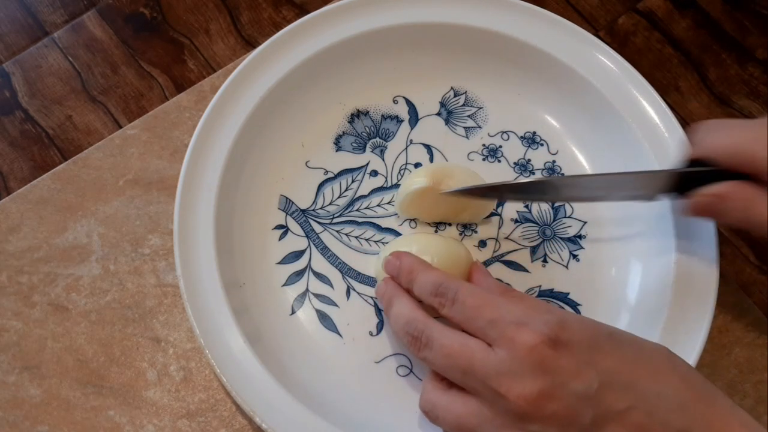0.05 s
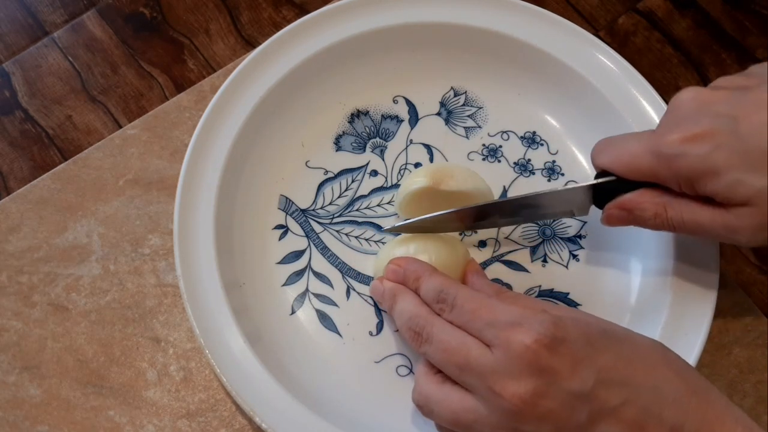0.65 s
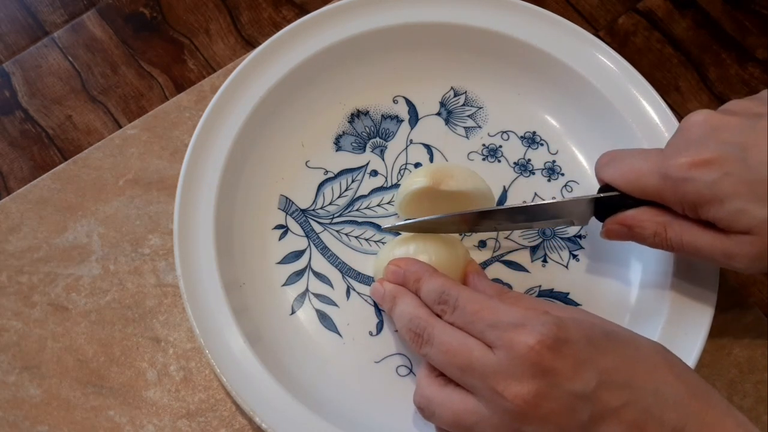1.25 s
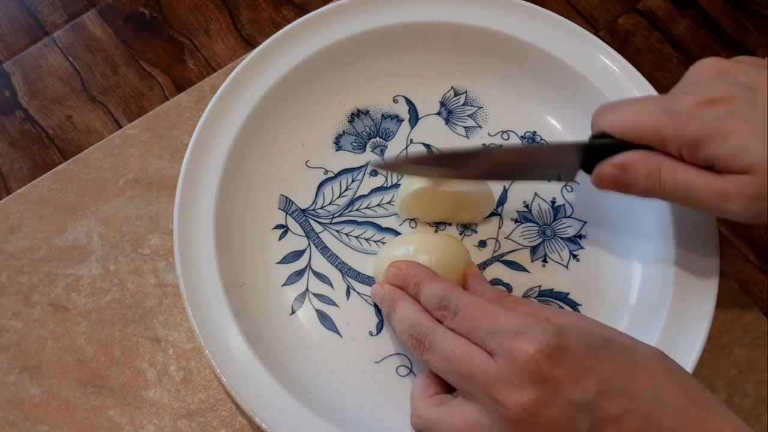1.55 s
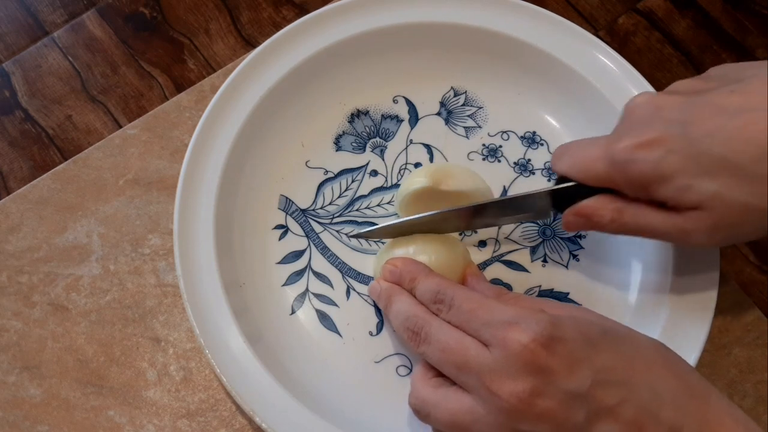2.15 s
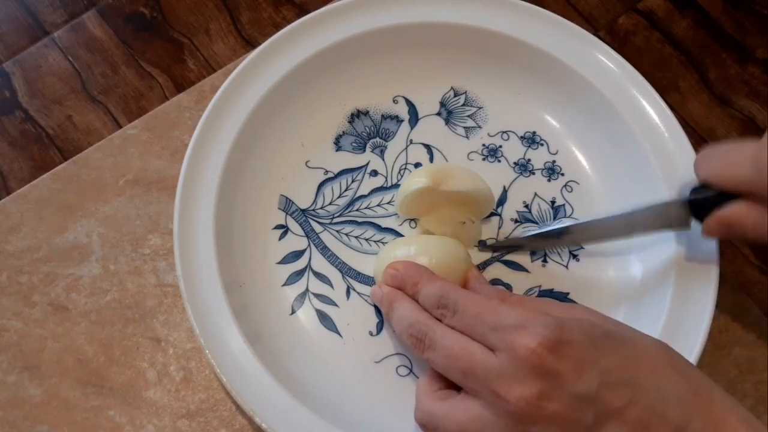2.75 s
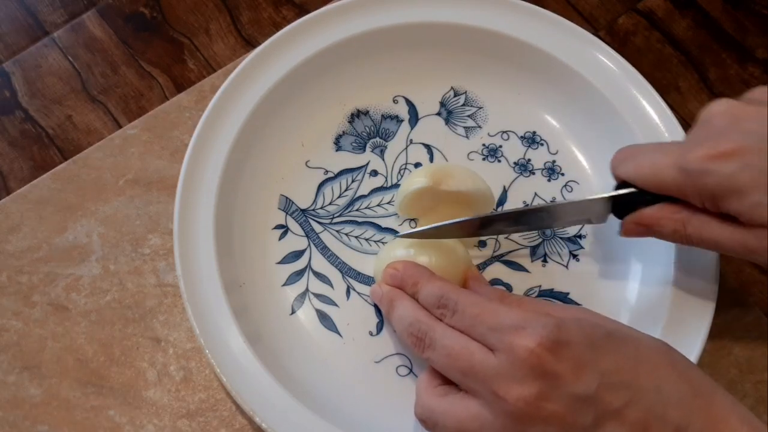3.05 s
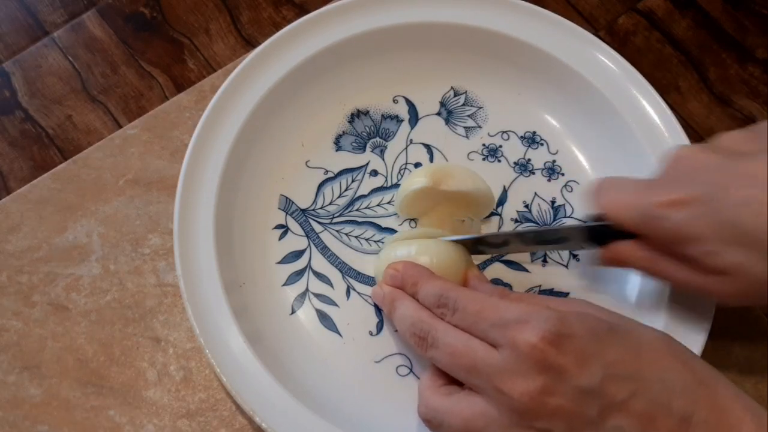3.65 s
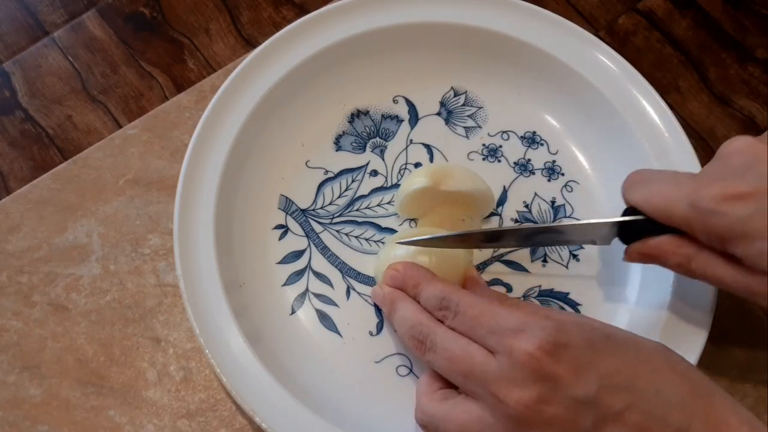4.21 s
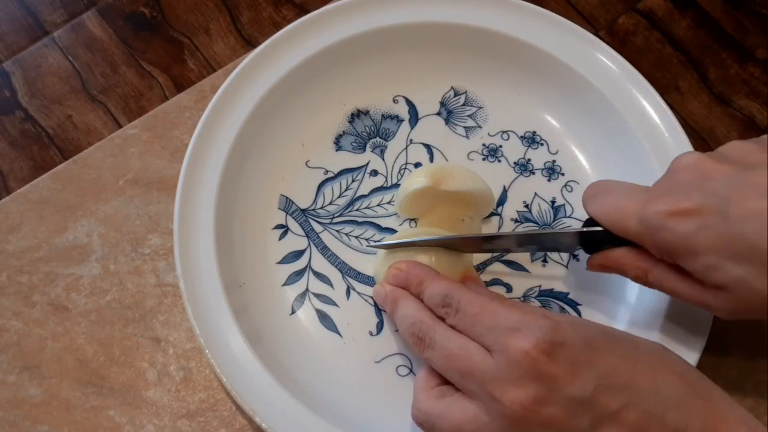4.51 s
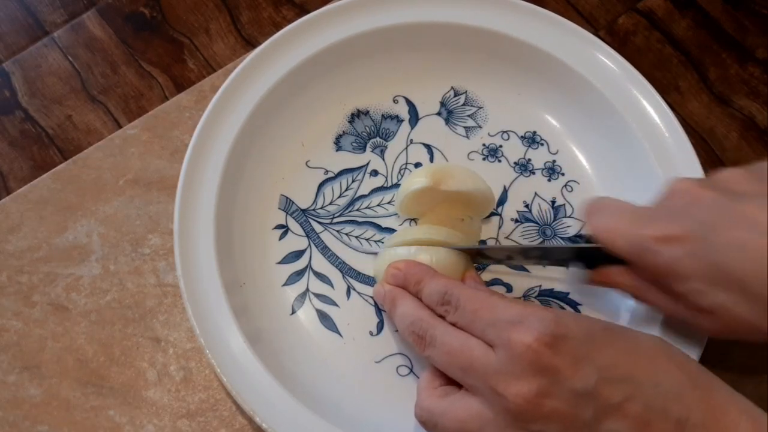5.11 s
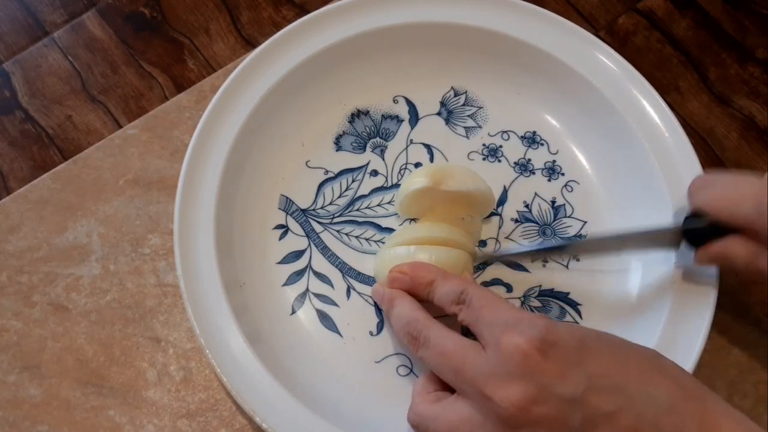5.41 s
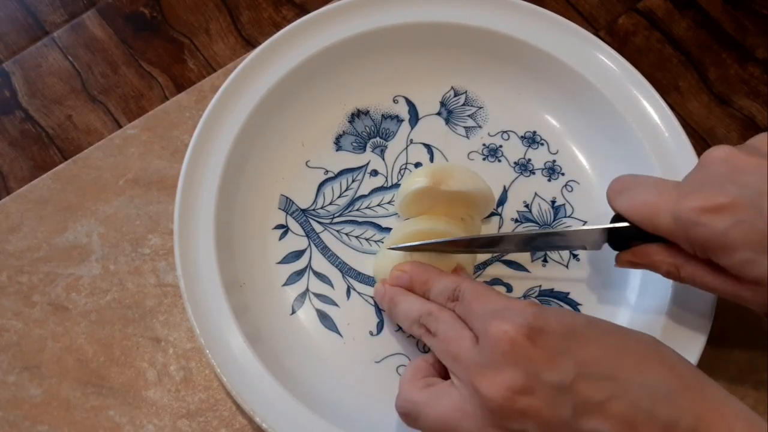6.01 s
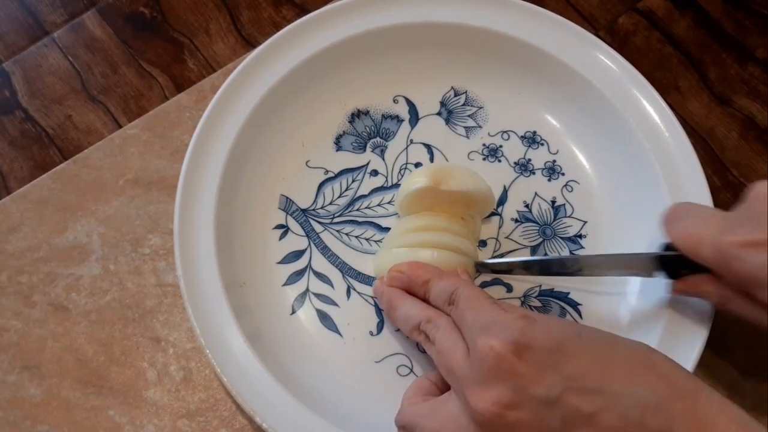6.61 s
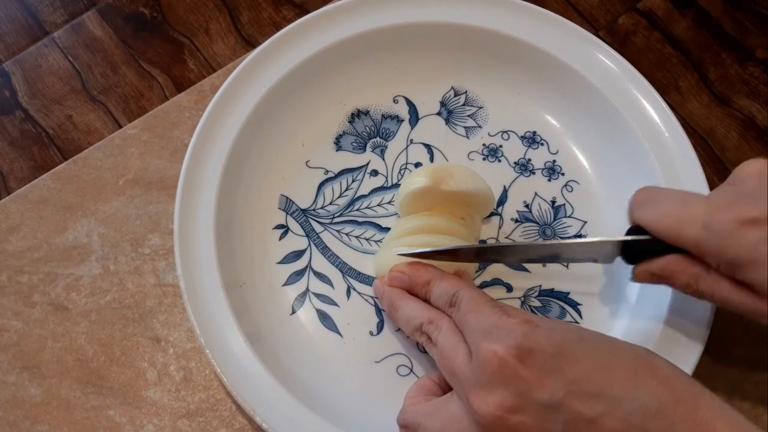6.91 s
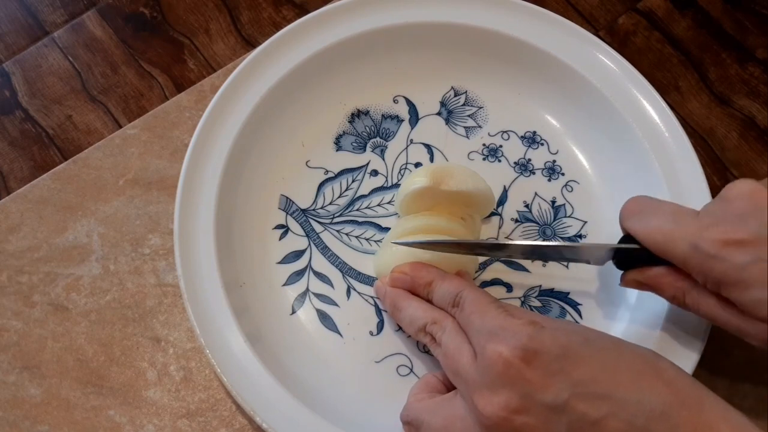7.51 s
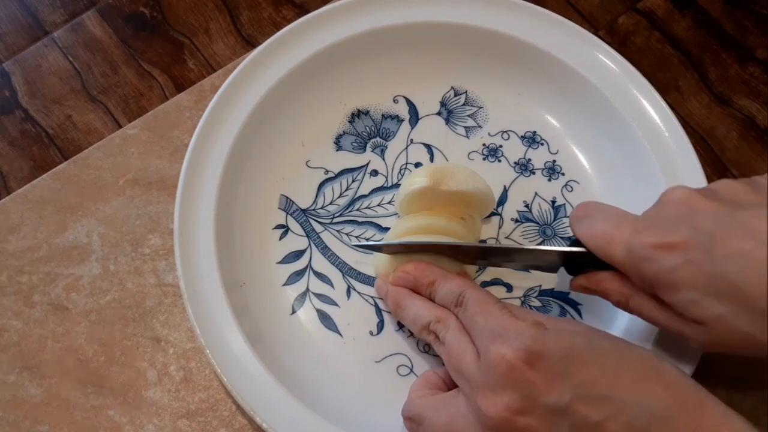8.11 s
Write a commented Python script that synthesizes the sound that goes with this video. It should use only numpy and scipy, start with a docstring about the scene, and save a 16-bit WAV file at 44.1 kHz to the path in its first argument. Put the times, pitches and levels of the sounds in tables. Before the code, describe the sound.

Motors hum with a slight throb over a soft rush of air in a kitchen. Very near the microphone, a knife pushes through an onion five times, crunching juicily and knocking against a ceramic plate and the wooden board under it. Early on, the edge rasps once across the plate as the table thumps. Between the later cuts the blade draws back with a moist crackle.

```python
"""Two motors hum and beat over a soft rush of air in a kitchen. Close to a pair of microphones, a knife
slices an onion on a ceramic plate that stands on a wooden board. In each of five cuts the blade breaks
through layer after layer, with knocks that sound the plate and board; wet cells crackle as it pushes
down and draws back. Once the edge drags on the glaze and the table thumps under the hand."""
import sys
import numpy as np
from scipy import signal
from scipy.fft import rfft, irfft, next_fast_len
from scipy.io import wavfile
from scipy.ndimage import uniform_filter1d

SR = 44100
rng = np.random.default_rng(int(sys.argv[2]) if len(sys.argv) > 2 else 0)


def int16_out(signal):
    """Quantize to a 16-bit WAV file."""
    q = np.round(np.clip(np.atleast_2d(signal).T, -1, 1) * 32767)
    wavfile.write(sys.argv[1], SR, q.astype(np.int16))


N = 364266

# colour of the air in the room: f/Hz, relative level/dB
AIR_COLOUR = [(12, -63), (20, -30), (49, -23), (134, -11), (168, -10), (193, -9), (216, -11), (248, -11.5),
              (367, -21), (558, -23), (802, -20.5), (2530, -50), (8410, -62.5), (13500, -56.5),
              (16000, -73.5)]
# how alike the room sounds at the two microphones: f/Hz, likeness/0-1
ROOM_LIKENESS = [(60, 1), (290, 0.73), (640, .42), (1400, 0), (15000, 0)]
# motors behind the scene: f/Hz, level/dB
MOTOR_HUMS = [(191.5, -44), (206, -50)]
# the background dips briefly after the thump: t/s, gain/dB
BACKGROUND_DIP = [(2.36, 1.5), (2.42, -5.5), (3.05, -6.5), (3.2, 0), (3.45, 1.5)]
# decay of the kitchen: f/Hz, t60/s
ROOM_DECAY = [(200, 0.43), (800, 0.3), (2500, 0.35), (7000, 0.33), (15000, 0.35)]
# balance of the microphones: f/Hz, left minus right/dB
MIC_BALANCE = [(30, 0.5), (190, 3.5), (300, 2), (500, 0.5), (750, 4.5), (1200, 1), (2300, 2), (5000, 2),
               (8000, 3), (14000, -1.5)]
# modes of plate and board, damped by onion and hand: f/Hz, relative level/dB, t60/s
PLATE_BOARD_MODES = [(201.8, -12, 0.12), (264.8, -2.5, 0.16), (439, -5, 0.047), (506, 1, 0.035),
                     (721, 5, 0.024), (795.7, 9, 0.027), (940, -2.5, .03), (1082, -7, 0.034),
                     (1550, 2, 0.01), (1795, 8, 0.035), (2343, 5.5, 0.066), (2530, -12.5, 0.0072),
                     (3450, -6.5, 0.013)]
# modes of the plate's free rim: f/Hz, relative level/dB, t60/s
RIM_MODES = [(1415, -9, .2), (2430, -8, .2), (2739, -7, .22), (3085, -9, .25), (3351, -9, .22),
             (3390, -7, .22), (3870, -2, .16), (4059, -5, .24), (4361, -12, .22), (4542, -12, .22),
             (4859, -10, .22)]
# modes of the gripped blade: f/Hz, relative level/dB, t60/s
BLADE_MODES = [(1038, -0.5, .04), (1331, -6, .04), (2465, -0.5, .06), (3160, -6.5, 0.04),
               (4430, -5.5, 0.06), (7240, -8.5, 0.039)]
# colour of bursting cells: f/Hz, relative level/dB
CELL_COLOUR = [(250, -5.5), (400, -12.5), (590, -13.5), (730, -0.5), (850, 1), (1270, -8.5), (1600, -5),
               (2050, -12.5), (2450, -6.5), (3500, -16), (7000, -19.5), (8800, -26), (11500, -23.5),
               (16000, -19.5)]
# colour of the edge dragging on the glaze: f/Hz, relative level/dB
RASP_COLOUR = [(200, -27), (280, -0.5), (450, -14), (640, -13), (780, 4), (1150, -9.5), (1450, 3),
               (2000, -16), (2500, -3.5), (3300, -6), (3900, -4.5), (5000, -10), (7000, -8), (9000, -23),
               (11500, -16), (16000, -37)]
# hand and onion bump the board: t/s, level/dB
BUMPS = [(1.677, -41), (1.735, -39.5), (2.895, -48), (4.093, -39.5), (5.615, -36), (5.935, -26.5),
         (6.954, -42.5), (8.01, -20)]
# the blade slips free of the onion: crest t/s, length/s, level/dB
SLIPS = [(2.715, 0.096, -50), (3.9, .022, -34.5), (6.749, 0.053, -46.5)]
# the blade glides along the wet cut: crest t/s, length/s, level/dB
GLIDES = [(.55, .13, -72.5), (1.375, 0.084, -65.5), (3.683, 0.17, -41), (4.99, 0.12, -43.5),
          (5.142, 0.092, -41), (5.284, 0.19, -57), (6.53, 0.12, -42)]
# the blade is pushed into the flesh: start t/s, end t/s, level at the end/dB
PUSHES = [(1.906, 2.003, -60), (2.02, 2.268, -52), (3.068, 3.337, -51), (3.377, 3.492, -35.5),
          (4.219, 4.456, -60), (4.636, 4.679, -35), (4.707, 4.761, -35.5), (5.73, 5.886, -67),
          (6.119, 6.186, -40.5), (6.282, 6.335, -32), (7.61, 7.857, -67.5), (8, 8.103, -46.5),
          (8.181, 8.239, -37.5)]
# a layer gives way, dull at the top of a cut, crisper further down: t/s, force/dB, crispness/dB
LAYER_BREAKS = [(1.927, -37.5, -0.5), (2.049, -23.5, -5), (2.061, -18, -4.5), (2.171, -18.5, -1.5),
                (2.188, -9, -1), (2.313, -22.5, 5), (2.341, -8, 4.5), (2.354, -9, 6.5), (3.098, -18, -5),
                (3.23, -12.5, -3), (3.364, -13, 1), (3.408, -19.5, -3), (3.437, -14, 4),
                (3.492, -11.5, 8.5), (3.898, -26, -1.5), (4.281, -5, -5), (4.452, -2.5, 1),
                (4.599, -9.5, 3.5), (4.627, -18.5, 7), (4.728, -18, -10.5), (4.986, -21.5, 5),
                (5.8985, -6, -4.5), (5.9023, -1, -8.5), (6.095, 0.5, -5.5), (6.122, -12.5, 4),
                (6.276, -16.5, 5), (6.291, -22.5, 10.5), (6.353, -18, 5), (6.522, -27.5, 12.5),
                (7.863, -12, -2), (7.867, -11.5, -0.5), (7.995, -9, 0), (8.006, -12, -1.5), (8.031, -18, 2),
                (8.089, -19.5, -6), (8.17, -27.5, 2.5), (8.203, -9.5, 3.5)]


def amp(db):
    """Decibels to gain."""
    return 10 ** (np.asarray(db) / 20)


def unit_rms(x):
    """Scales to rms 1."""
    return x / np.sqrt(np.mean(x ** 2) + 1e-20)


def unit_blow(x):
    """Scales a blow to the energy of 20 ms at rms 1."""
    return x / np.sqrt(np.sum(x ** 2) / (0.02 * SR))


def curve_at(points, hz):
    """Reads a curve on a log-frequency axis."""
    f, value = np.transpose(points)
    return np.interp(np.log(hz + 1), np.log(f + 1), value)


def add(mix, start_s, sound):
    """Mixes a sound in at its start time."""
    part = mix[..., round(start_s * SR):][..., :sound.shape[-1]]
    part += sound[..., :part.shape[-1]]


def convolve(x, response):
    """Passes x through a response, or one for each channel."""
    return signal.oaconvolve(np.atleast_2d(x), np.atleast_2d(response), axes=1)[:, :N]


def excite(drive, response):
    """Drives a response scaled to unit energy."""
    return convolve(drive, response / np.linalg.norm(response))


def band(x, low_hz, high_hz, order=3):
    """Causal band-pass."""
    return signal.sosfilt(signal.butter(order, [low_hz, high_hz], "band", fs=SR, output="sos"), x)


def click(colour, size=2048):
    """The shortest causal click with the given spectrum."""
    hz = abs(np.fft.fftfreq(size, 1 / SR))
    log_gain = np.log(amp(curve_at(colour, hz)))
    return np.fft.ifft(np.exp(signal.hilbert(log_gain).conj())).real[:size // 2]


def wander(per_s):
    """A random drift of rms 1 that turns per_s times a second."""
    knots = rng.standard_normal(int(per_s * N / SR) + 24)
    return unit_rms(np.interp(np.arange(N) * per_s / SR, np.arange(len(knots)), knots))


def swells(rows, t):
    """A smooth rise and fall for each row of crest t/s, length/s, level/dB."""
    return sum(amp(db) * np.exp(-(2 * (t - crest) / length) ** 2) for crest, length, db in rows)


def ring(modes, spread_db=0, detune=0):
    """Dying modes, one row each; the spot that is struck can shift their balance and pitch a little."""
    hz, db, t60 = np.transpose(modes)[:, :, None]
    louder, sharper = rng.standard_normal((2, len(modes), 1))
    t = np.arange(14000) / SR
    envelope = amp(db + spread_db * louder - 60 * t / t60)
    return envelope * np.sin(2 * np.pi * hz * (1 + detune * sharper) * t)


def grains(per_s, spread_db):
    """Random clicks of either sign, a few much larger than the rest."""
    heights = amp(spread_db * np.minimum(rng.exponential(1, N), 4)) * rng.choice([-1, 1], N)
    return unit_rms(heights * (rng.random(N) < per_s / SR))


def friction(per_s, spread_db):
    """Dense tiny catches, half of them common to both microphones."""
    shared, left, right = (grains(per_s, spread_db) for _ in range(3))
    return unit_rms(shared + np.array([left, right]))


def room_pair(spectra, hz):
    """Blends two independent spectra so that the bass reaches both microphones alike."""
    left, other = spectra
    likeness = curve_at(ROOM_LIKENESS, hz)
    return np.array([left, likeness * left + np.sqrt(1 - likeness ** 2) * other])


def air(level_db=-48, swell_db=0.45):
    """Room tone: a soft, low rush of air that swells slightly."""
    hz = np.fft.rfftfreq(N, 1 / SR)
    noise = room_pair(rfft(rng.standard_normal((2, N))), hz)
    rush = unit_rms(irfft(noise * amp(curve_at(AIR_COLOUR, hz)), N))
    return amp(level_db + swell_db * wander(4.9)) * rush


def motors(drift_hz=0.25, waver_db=1):
    """Two motors in the background, a little apart in pitch, beat against each other."""
    hum = np.zeros(N)
    for hz, db in MOTOR_HUMS:
        peak = np.sqrt(2) * amp(db + waver_db * wander(3.8))
        cycles = np.cumsum(hz + drift_hz * wander(2)) / SR
        hum += peak * np.sin(2 * np.pi * cycles)
    return hum


def kitchen(x, low_db, high_db, gap_s=0.003, build_s=0.0074):
    """The room returns sparse reflections that die band by band."""
    taps = rng.standard_normal((2, SR)) * (rng.random((2, SR)) < 1 / 16)
    taps *= np.clip((np.arange(SR) / SR - gap_s) / build_s, 0, 1)
    hz, t, spectra = signal.stft(taps, SR, nperseg=256)
    hz = hz[:, None]
    spectra = room_pair(spectra, hz) * amp(-60 * t / curve_at(ROOM_DECAY, hz))
    norm = np.linalg.norm(signal.istft(spectra[0], SR, nperseg=256)[1])
    tilt = amp(curve_at([(700, low_db), (3500, high_db)], hz))
    tail = signal.istft(spectra * tilt, SR, nperseg=256)[1]
    return convolve(x, tail / norm)


def table_thump(start_s=2.354, hz=80, level_db=-18, rise_s=0.0043, pan_db=3):
    """The hand lands with the knife and the table gives one low heave, left of centre."""
    out, t = np.zeros((2, N)), np.arange(SR // 4) / SR
    envelope = amp(level_db) * t / rise_s * np.exp(1 - t / rise_s)
    add(out, start_s, envelope * np.sin(2 * np.pi * hz * t))
    return out * amp([[pan_db], [-pan_db]])


def board_bumps(rise_s=0.0024, db_per_octave=-7):
    """A soft push builds up slowly and stirs only the low modes of plate and board."""
    out, hz = np.zeros((2, N)), np.transpose(PLATE_BOARD_MODES)[0]
    dulling = amp(db_per_octave * np.log2(hz / hz[0]))[:, None]
    for start_s, db in BUMPS:
        low_ring = (ring(PLATE_BOARD_MODES, detune=0.012) * dulling)[hz < 900].sum(0)
        t = np.arange(len(low_ring)) / SR
        add(out, start_s, amp(db) * unit_blow(low_ring * (1 - np.exp(-t / rise_s))))
    return out


def tip_slips(rim_db=-18):
    """The dry tip of the blade brushes the plate on its way out, and the rim answers faintly."""
    rub = swells(SLIPS, np.arange(N) / SR) * friction(per_s=9000, spread_db=2.5)
    dry_click = band(click(CELL_COLOUR), 650, 2600, order=1)
    return excite(rub, dry_click) + amp(rim_db) * excite(rub, ring(RIM_MODES).sum(0))


def glaze_scrape(crest_s=2.387, rise_s=0.033, fall_s=0.048, level_db=-23, rim_db=-11):
    """The edge drags over the glaze in a dense rasp and sets the rim ringing."""
    t = np.arange(N) / SR - crest_s
    swell = amp(level_db) * np.exp(-np.where(t < 0, (t / rise_s) ** 2, t / fall_s))
    drag = swell * friction(per_s=13000, spread_db=3.5)
    return excite(drag, click(RASP_COLOUR)) + amp(rim_db) * excite(drag, ring(RIM_MODES).sum(0))


def cutting_gains(t, bite_s=0.012, grow_db_per_s=27, stop_s=0.0041, firm_db=-35):
    """Gains of body, crunch and fizz as the blade pushes, breaks through and glides."""
    power = 1e-14
    for start, end, db in PUSHES:  # each bites, grows as more of the edge is buried, and stops
        hold = np.clip((t - start) / bite_s, 0, 1) * np.exp(-np.maximum(t - end, 0) / stop_s)
        power += (hold * amp(db - grow_db_per_s * np.maximum(end - t, 0))) ** 2
    lead_s, trail_s, tear_db = 0.0037, 0.013, -28.5
    for break_s, force, crisp in LAYER_BREAKS:  # cells tear just before a break and burst on after it
        tear = np.exp(-abs(t - break_s) / np.where(t < break_s, lead_s, trail_s))
        power += (amp(force + crisp + tear_db) * tear) ** 2
    effort_db = 10 * np.log10(power) - firm_db
    glide = swells(GLIDES, t)
    body = np.hypot(amp(firm_db + 6.1 + 0.8 * effort_db), amp(1) * glide)  # a slow push is duller
    crunch = np.hypot(amp(firm_db + effort_db), glide)
    fizz = np.hypot(amp(firm_db - 4.5 + 0.86 * effort_db), amp(-2.5) * glide)
    return body, crunch, fizz


def bursting_cells(bands_db=-1, blade_db=-8, rim_db=-17):
    """Cells burst by the thousand: body from the plate, crunch from the skins, fizz from the juice."""
    t = np.arange(N) / SR
    coarse_t = t[::44]
    body, crunch, fizz = (np.interp(t, coarse_t, gain) for gain in cutting_gains(coarse_t))
    clumps = unit_rms(amp(1.2 * wander(200)))
    centre = clumps * grains(per_s=4000, spread_db=4)
    spray = clumps * np.array([grains(per_s=7600, spread_db=3.5) for _ in range(2)])  # one a microphone

    def crackle(gain, low_hz, high_hz, width):
        drive = gain * unit_rms(centre + width * spray)
        return excite(drive, band(click(CELL_COLOUR), low_hz, high_hz))

    bands = (crackle(body, 220, 1250, width=0.29)
             + crackle(crunch, 1250, 5000, width=0.88)
             + crackle(fizz, 5200, 13000, width=1))
    rim = excite(crunch * centre, ring(RIM_MODES).sum(0))
    blade = excite(crunch * unit_rms(spray), ring(BLADE_MODES).sum(0))
    return amp(bands_db) * bands + amp(blade_db) * blade + amp(rim_db) * rim


def squelch(x, patchy_db=3.2, bins=9, frames=3):
    """Wet pockets open and close along the blade, so brief resonances come and go in the crunch."""
    spectra = signal.stft(x, SR, nperseg=512)[2]
    noise = rng.standard_normal(spectra.shape[1:])
    patches = unit_rms(uniform_filter1d(uniform_filter1d(noise, bins, 0), frames, 1))
    return signal.istft(spectra * unit_rms(amp(patchy_db * patches)), SR, nperseg=512)[1][:, :N]


def fractures(response, decay_s, rise_s=0.0013):
    """A quick run of tiny fractures strikes a response, partly alike at the two microphones."""
    t = np.arange(1024) / SR
    tear = rng.standard_normal((2, len(t))) * np.exp(-t / decay_s) * (1 - np.exp(-t / rise_s))
    return np.sqrt(2) * unit_blow(convolve(tear + 0.11 * tear[::-1], response))


def layer_knocks(plate_rise_s=0.0013, board_rise_s=0.0042, choke_s=0.0035, bounce_s=0.0038, bounce=0.17):
    """Each layer snaps, rings the plate and then the heavier board, and the knock bounces once."""
    out, hz = np.zeros((2, N)), np.transpose(PLATE_BOARD_MODES)[0]
    in_board, in_rim = hz < 350, hz > 1300
    in_plate = ~in_board & ~in_rim
    cell_click = band(click(CELL_COLOUR), 2800, 12000, order=2)
    for start_s, force, crisp in LAYER_BREAKS:
        modes = ring(PLATE_BOARD_MODES, spread_db=1.5, detune=0.018)
        # a heavier blow presses longer and sounds deeper
        modes *= amp(-5 * amp(force) * np.log2(hz / hz[0]))[:, None]
        t = np.arange(modes.shape[1]) / SR
        plate = amp(force - 14.5) * unit_blow(modes[in_plate].sum(0) * (1 - np.exp(-t / plate_rise_s)))
        thud = unit_blow(modes[in_board].sum(0) * (1 - np.exp(-t / board_rise_s)))
        choked_rim = modes[in_rim].sum(0) * np.exp(-t / choke_s)  # damped by onion and gripped blade
        clack = fractures(choked_rim, decay_s=0.0013)
        snap = fractures(cell_click, decay_s=0.0034)
        add(out, start_s, plate)
        add(out, start_s + bounce_s, bounce * plate)
        add(out, start_s, amp(force - 22 - 0.18 * crisp) * thud)
        add(out, start_s, amp(force - 23 + 0.67 * crisp) * clack)
        add(out, start_s, amp(force - 28 + 1.55 * crisp) * snap)
    return band(out, 140, 20000, order=2)


def scene():
    """Knife, onion and plate close to the microphones, the kitchen around them, the motors behind."""
    hits = layer_knocks() + board_bumps()
    cuts = squelch(bursting_cells()) + glaze_scrape() + tip_slips()
    room = kitchen(hits, low_db=-13.5, high_db=-9) + kitchen(cuts, low_db=-9, high_db=-8.5)
    dip = amp(np.interp(np.arange(N) / SR, *np.transpose(BACKGROUND_DIP)))
    return dip * (air() + motors()) + room + table_thump() + cuts + hits


def record(dry, lag_s=0.00006, cutoff_hz=15950):
    """The two microphones differ in colour, the right hears a little later, and the top treble is cut."""
    size = next_fast_len(N + SR)
    hz = np.fft.rfftfreq(size, 1 / SR)
    lean = amp(curve_at(MIC_BALANCE, hz) / 2)
    microphones = np.array([lean, np.exp(-2j * np.pi * hz * lag_s) / lean])
    heard = irfft(rfft(dry, size) * microphones, size)[:, :N]
    low_pass = signal.firwin(511, cutoff_hz, window=("kaiser", 9), fs=SR)
    return signal.oaconvolve(heard, low_pass[None], "same", axes=1)


dry = scene()
out = record(dry)
int16_out(out)
```